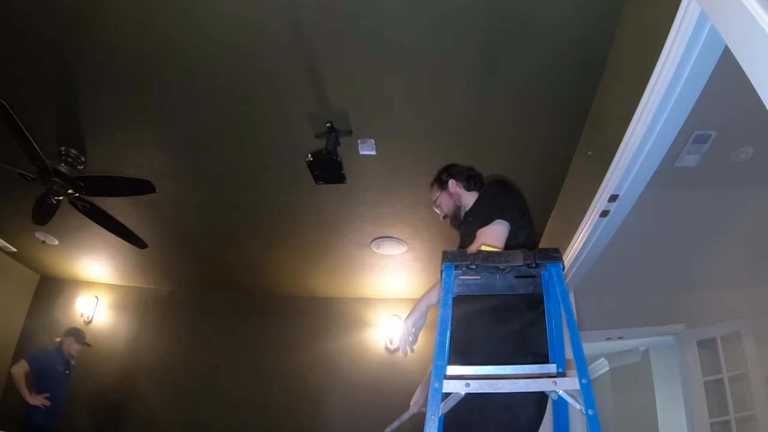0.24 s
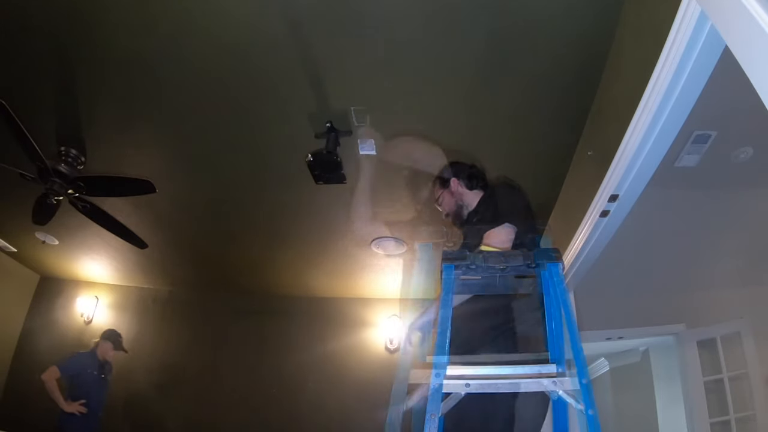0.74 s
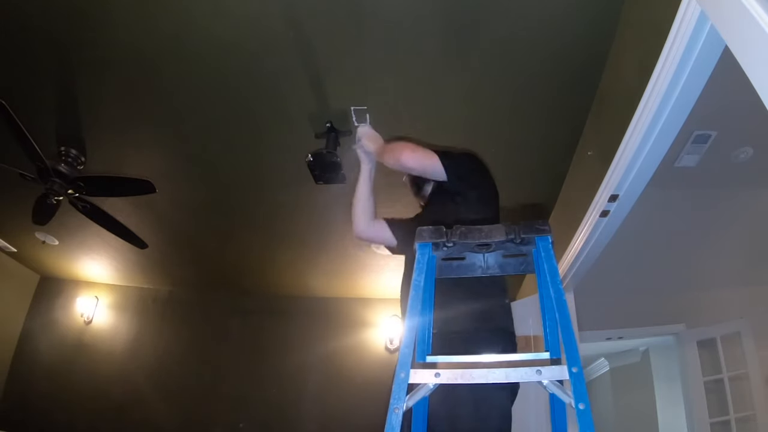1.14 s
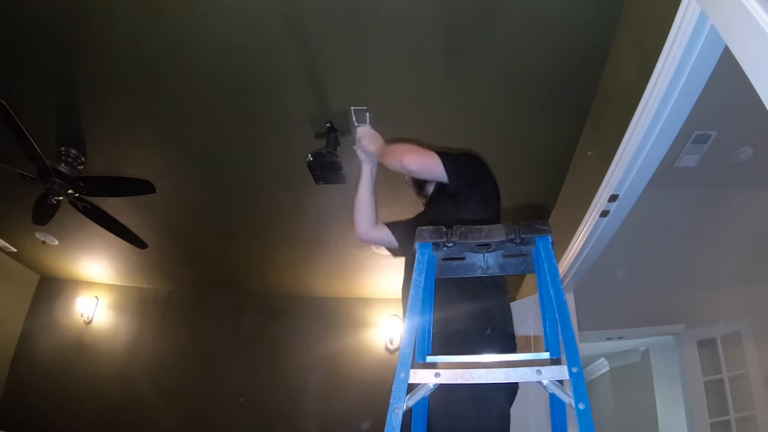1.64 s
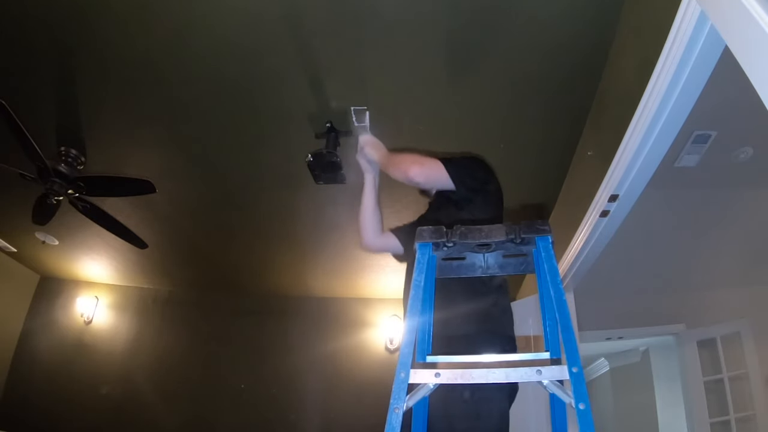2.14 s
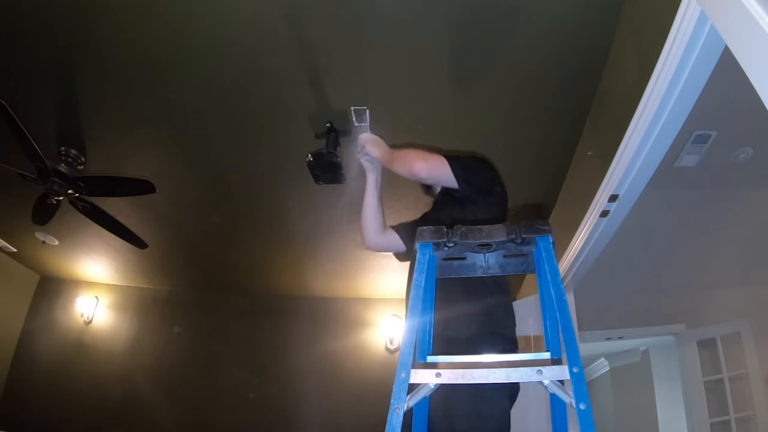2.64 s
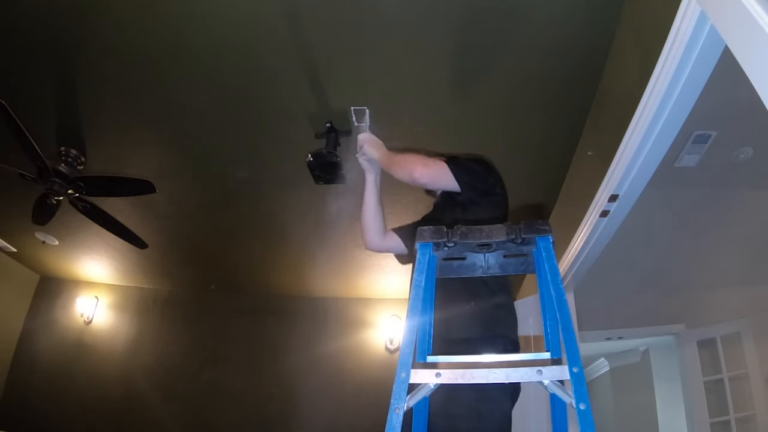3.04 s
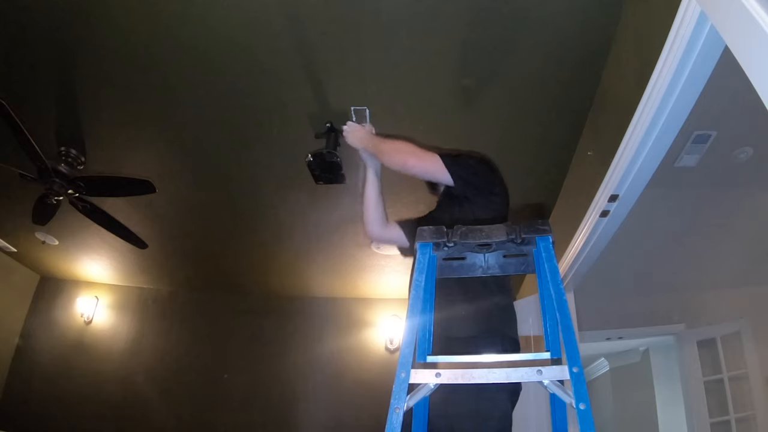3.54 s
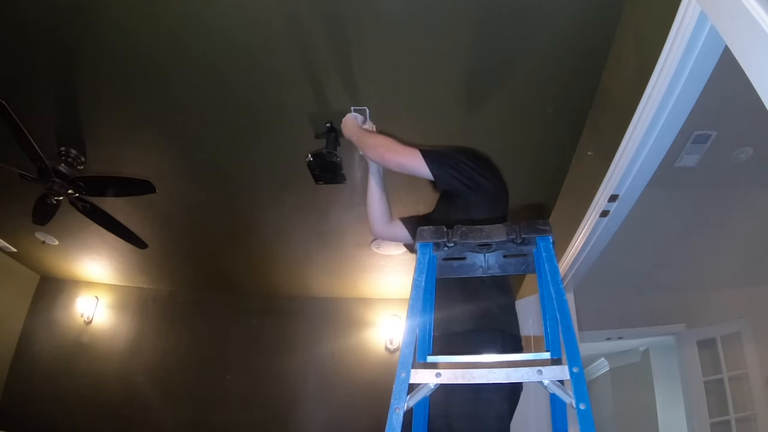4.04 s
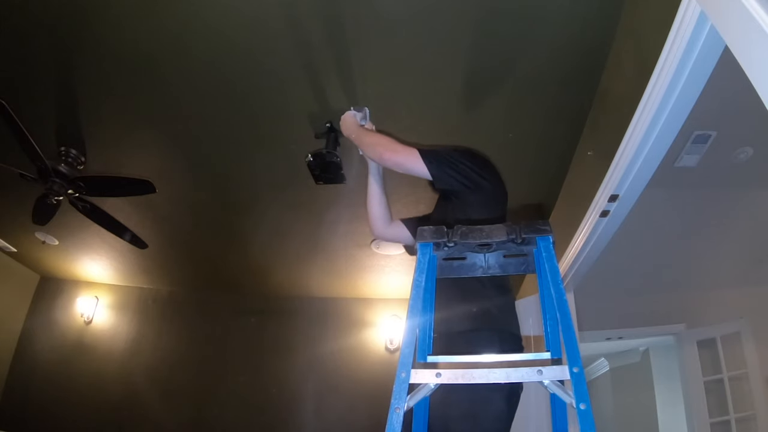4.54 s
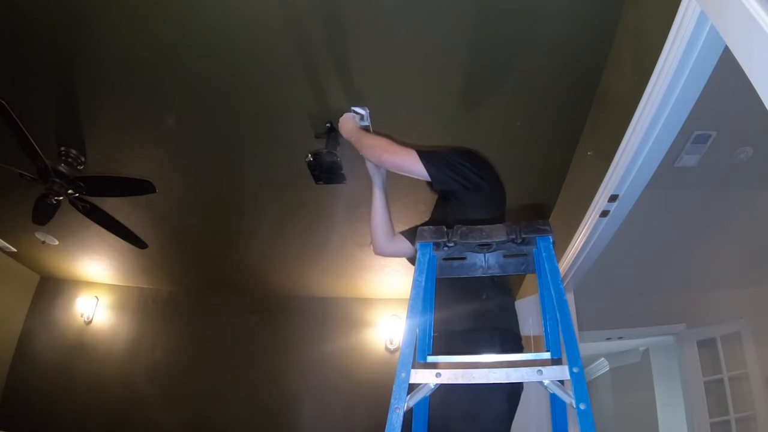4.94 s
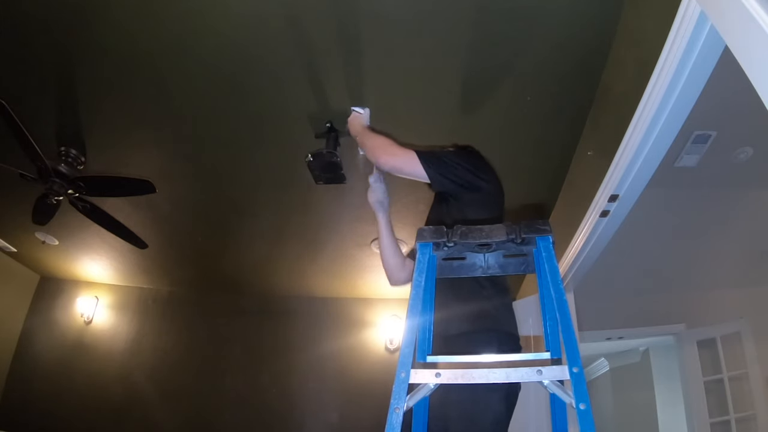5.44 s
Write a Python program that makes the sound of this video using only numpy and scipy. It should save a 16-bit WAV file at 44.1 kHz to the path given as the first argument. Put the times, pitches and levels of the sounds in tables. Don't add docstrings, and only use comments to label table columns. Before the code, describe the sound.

Overhead, a jab saw chews through drywall in brisk strokes with low hollow booming, after two bumps, ending in falling crumbs.

```python
import sys
import numpy as np
from scipy import signal
from scipy.fft import rfft, irfft, next_fast_len
from scipy.io import wavfile
from scipy.ndimage import uniform_filter1d, map_coordinates

SR = 44100
rng = np.random.default_rng(int(sys.argv[2]) if len(sys.argv) > 2 else 0)


def attenuation_scalar(level_db):
    decades = np.asarray(level_db, float) / 20
    return 10 ** decades


def store_wav(level_fs):
    pcm = np.round(np.clip(np.atleast_2d(level_fs), -1, 1) * 32767)
    wavfile.write(sys.argv[1], SR, pcm.T.astype(np.int16))


N = 250488


def unit(x):
    return x / np.sqrt(np.mean(x ** 2) + 1e-20)


def noise():
    return rng.standard_normal((2, N))


def along(points, hz):
    f, v = np.transpose(points)
    return np.interp(np.log(hz + 1), np.log(f + 1), v)


def wobble(knots_hz):
    knots = rng.standard_normal(int(N * knots_hz / SR) + 4)
    return map_coordinates(knots, [np.arange(N) * knots_hz / SR])


def gate(edges_s):
    return np.interp(np.arange(N) / SR, edges_s, [0, 1, 1, 0])


def shifted(x, seconds):
    return np.roll(x, round(seconds * SR))


def steady(x, seconds):
    power = np.abs(uniform_filter1d(x ** 2, int(seconds * SR)))
    return x / np.sqrt(power + 1e-3 * np.mean(x ** 2))


def filtered(x, response):
    m = next_fast_len(N + SR // 2)
    return irfft(rfft(x, m) * response(np.fft.rfftfreq(m, 1 / SR)), m)[..., :N]


def mode_bank(f, modes):
    total = 0
    for k, (hz, width_hz, db) in enumerate(modes):
        damping = 1j * f * width_hz
        total = total + (-1) ** k * attenuation_scalar(db) * damping / (hz * hz - f * f + damping)
    return total


def resonant(x, modes, broad_hz, wide_hz):
    broad = [(broad_hz, wide_hz, 0)]
    return filtered(x, lambda f: mode_bank(f, modes) * mode_bank(f, broad))


def coloured(spectrum, channels=1):
    white = rng.standard_normal((channels, N))
    return unit(filtered(white, lambda hz: attenuation_scalar(along(spectrum, hz)))).squeeze()


def ringing(modes, t):
    return sum(attenuation_scalar(db - 60 * t / t60) * np.sin(2 * np.pi * hz * t) for hz, db, t60 in modes)


# frequency in Hz, correlation.
LIKENESS = [(30, 0.67), (60, 0.93), (400, 0.92), (650, 0.42), (1200, 0.079), (3000, 0.6), (8000, 0.13)]


def paired(a, b):
    def angle(hz):
        return np.arccos(np.clip(along(LIKENESS, hz), -1, 1)) / 2
    mid, side = filtered(np.array([a, b]), lambda hz: np.array([np.cos(angle(hz)), np.sin(angle(hz))]))
    return np.array([mid + side, mid - side])


# frequency in Hz, level in dB per Hz.
HUSH_SPECTRUM = [(15, -21.5), (25, -3), (56, -11.5), (81, -20.5), (191, -7), (450, -28), (833, -24.5),
                 (2070, -34), (11500, -45), (13800, -64), (15000, -41.5)]


def hush():
    level_db = -61
    return attenuation_scalar(level_db) * paired(*coloured(HUSH_SPECTRUM, channels=2))


# frequency in Hz, t60 in seconds.
ROOM_DECAY = [(60, 0.5), (200, 0.27), (1000, 0.46), (4000, 0.39), (12000, 0.29)]


def room(x):
    step, delay = SR // 4, 300
    out = np.zeros((2, N + 2 * SR))
    x, fade = np.pad(x, (step, 2 * step)), np.hanning(2 * step)
    for at in range(0, N + step, step):
        hz, t, z = signal.stft(rng.standard_normal((2, SR // 2)), SR, nperseg=256)
        decay = attenuation_scalar(-60 * t / along(ROOM_DECAY, hz)[:, None])
        tail = signal.istft(z * decay, SR, nperseg=256)[1]
        tail = tail / np.linalg.norm(tail[0])
        wet = signal.fftconvolve((fade * x[at:at + 2 * step])[None], tail, axes=1)
        out[:, at + delay:][:, :wet.shape[1]] += wet
    return paired(*out[:, step:step + N])


# start in seconds, floor ring in dB, thud in dB rel, hard knock in dB rel.
BLOWS = [
    (0.192, -29.5, 2, -21),
    (.212, -17.5, -24.5, -45),
    (0.504, -59, 22, 26),
    (0.564, -34.5, -12.5, -37),
    (4.776, -61, 5.5, -30),
    (4.988, -60.5, 0, -33),
]
# frequency in Hz, level in dB, t60 in seconds.
FLOOR_MODES = [(76.4, 3, 0.24), (155.4, 2, 0.28), (215.5, -6.5, 0.14)]
# frequency in Hz, level in dB, t60 in seconds.
RAIL_MODES = [(166.5, 1, 0.4), (335.6, -10.5, 0.6), (614, -21, 0.15), (787, -2.5, 0.035)]
# frequency in Hz, level in dB per Hz.
THUD_SPECTRUM = [(110, -42.5), (180, -3), (218, -4), (251, -11), (583, -19.5), (1770, -44), (2360, -62),
                 (8000, -80), (10400, -105), (17600, -120)]
# frequency in Hz, level in dB per Hz.
CRACK_SPECTRUM = [(530, -35.5), (900, -8), (2200, -16.5), (7670, -16.5), (8730, -23), (9370, -58),
                  (10900, -37), (15000, -38.5)]


def ladder_blows():
    out, t = np.zeros(N + SR), np.arange(SR // 2) / SR
    thud, crack = coloured(THUD_SPECTRUM), coloured(CRACK_SPECTRUM)
    rise = 1 - np.exp(-t / 0.0041)
    for start_s, ring_db, thud_db, hard_db in BLOWS:
        at = round(start_s * SR)
        soft = ringing(FLOOR_MODES, t) + attenuation_scalar(thud_db - 60 * t / 0.3) * thud[at:][:len(t)]
        hard = ringing(RAIL_MODES, t) + attenuation_scalar(-17.5 - 60 * t / 0.35) * crack[at:][:len(t)]
        out[at:][:len(t)] += attenuation_scalar(ring_db) * (soft * rise + attenuation_scalar(hard_db) * hard)
    return out[:N]


# peak in seconds, level in dB.
LURCHES = [(1.31, -27), (1.58, -31), (1.85, -30), (2.31, -31), (2.74, -29), (3.2, -29), (3.82, -29),
           (4.17, -35), (4.45, -34), (4.58, -38.5)]


def sway():
    rise_db_s, fall_db_s = 36.5, 43
    peak_s, db = np.transpose(LURCHES)[:, :, None]
    since = np.arange(N) / SR - peak_s
    drop_db = np.maximum(fall_db_s * since, -rise_db_s * since)
    return np.sqrt(np.sum(attenuation_scalar(db - drop_db) ** 2, axis=0))


# frequency in Hz, width in Hz, level in dB.
JOIST_MODES = [(42.7, 21, 5), (63.2, 6.9, 7.5), (80, 44, 3)]
# fade-in start and end, fade-out start and end in seconds.
SETTLE_S = [4.6, 4.66, 4.72, 4.77]


def ladder_rocking():
    settle_db = -14.5
    rumble = unit(resonant(noise(), JOIST_MODES, broad_hz=55, wide_hz=77.4))
    active = gate([.66, .72, 4.6, 4.65]) + attenuation_scalar(settle_db) * gate(SETTLE_S)
    return active * sway() * rumble


# start in seconds, peak in dB, time for the rustle to fall by 85 dB in seconds.
CRUMB_FALLS = [(4.639, -31, 0.074), (4.658, -30.5, 0.033), (4.774, -36.5, 0.036), (4.81, -57, 0.11),
               (4.835, -37, 0.042), (4.897, -64.5, 0.048), (4.936, -55, 0.047), (4.987, -39.5, 0.03),
               (5.038, -51.5, 0.095), (5.131, -28.5, 0.066), (5.15, -52, 0.051), (5.185, -31.5, 0.075),
               (5.212, -39, 0.053), (5.23, -34.5, 0.075), (5.251, -37, 0.05), (5.343, -24.5, 0.048),
               (5.37, -35.5, 0.065), (5.397, -40, 0.087), (5.658, -36, 0.17)]
# frequency in Hz, width in Hz, level in dB.
SHEET_MODES = [(908, 280, -7), (1200, 346, -1.5), (1530, 354, -3.5), (2340, 340, -13.5), (2990, 260, -7),
               (3500, 330, -9), (4300, 550, -13.5), (6000, 800, -8.5), (7440, 850, -8.5),
               (11200, 5200, -47.5)]


def crumbs():
    swell, t = np.zeros(N + SR), np.arange(SR // 4) / SR
    rise = 1 - np.exp(-t / 0.004)
    for start_s, db, t60 in CRUMB_FALLS:
        swell[round(start_s * SR):][:len(t)] += attenuation_scalar(db - 4.5 - 85 * t / np.abs(t60)) * rise
    crackle = attenuation_scalar(2.5 * wobble(400)) * rng.standard_normal(N)
    return swell[:N] * steady(resonant(crackle, SHEET_MODES, broad_hz=2946, wide_hz=12000), 0.016)


# time in seconds, board boom in dB, tooth rate in Hz, blade rasp in dB,
# fine dust in dB rel.
FULL_STROKES = [ (0.901, -25, 144.1, -47.5, -2.5), (1.075, -25.5, 145.8, -43.5, -6),
                (1.27, -17, 136.7, -42.5, -3), (1.49, -18.5, 161.5, -42.5, -6),
                (1.735, -15.5, 158.5, -41.5, -3.5), (1.94, -22, 163, -41, -8),
                (2.135, -15.5, 143.4, -41, -3), (2.32, -19, 160, -42, -8), (2.5, -16.5, 139.5, -44.5, -7.5),
                (2.74, -20.5, 130.8, -42, -4.5), (2.94, -21, 133, -44.5, -6.5),
                (3.14, -28, 104.1, -46, -7.5), (3.37, -30, 121.8, -51, -5.5),
                (3.56, -19, 141.1, -43.5, -6.5), (3.736, -21, 123, -45, -7), (3.96, -27.5, 129, -49, -5.5),
                (4.11, -26.5, 139.9, -48.5, -5.5), (4.3, -33.5, 181, -47, -2.5)]
BLADE_DRAGS = [
    (.73, -46, 159.7, -68, -7),
    (.8, -44, 137, -65, -10),
    (.83, -28, 144.5, -54, -7.5),
    (4.401, -31.5, 182.1, -48, -8),
    (4.54, -36.5, 143.2, -61.5, -5),
    (4.658, -59.5, 145, -66, -10),
    (4.872, -53.5, 174.3, -59.5, -11),
    (5.04, -54.5, 138.5, -66.5, -4),
]
# time in seconds, pause depth 0-2, grab of the teeth on the next stroke in dB.
REVERSALS = [ (.995, 0.59, -0.5), (1.179, 1.01, -3.5), (1.408, 1.33, -3.5), (1.615, 1.01, 0),
             (1.839, 0.89, 1.5), (2.03, 0.91, -3), (2.232, 0.82, -0.5), (2.428, 0.88, -1),
             (2.648, 1.42, 1.5), (2.851, 0.84, 5), (3.052, 0.98, 2.5), (3.264, 1.07, -1.5), (3.46, 1.29, 1),
             (3.666, 0.96, 0.5), (3.88, 0.83, 2), (4.023, 0.78, 0.5), (4.26, 1.6, -2)]


def strokes():
    turn_shape = 1.8
    t, rows = np.arange(N) / SR, np.array(sorted(FULL_STROKES + BLADE_DRAGS))
    index = np.arange(len(rows))
    row = np.interp(t, rows[:, 0], index)
    row -= np.sin(2 * np.pi * row) / (2 * np.pi)
    turn_s, depth, grab_db = np.transpose(REVERSALS)
    marks_s = np.sort(np.r_[turn_s, np.array(FULL_STROKES)[:, 0]])
    swing = np.interp(t, marks_s, np.arange(len(marks_s))) / 2
    turn = np.interp(t, turn_s, depth) * np.abs(np.sin(np.pi * swing)) ** turn_shape
    grab_db = np.interp(swing, np.arange(len(FULL_STROKES)), np.r_[0, grab_db])
    return [np.interp(row, index, column) for column in rows.T[1:]], turn, grab_db


# frequency in Hz, width in Hz, level in dB.
BOOM_MODES = [(109, 16, 2.5), (135.3, 28.8, -2.5), (163, 22.6, -1.5), (197.2, 30.8, -5.5)]
# fade-in start and end, fade-out start and end in seconds.
JAM_S = [4.16, 4.22, 4.95, 5.12]


def board_boom(teeth, crumble, push_db, turn):
    lag_s, turn_db, turn_hold = 0.0041, 13, 1.5
    boom_db = shifted(push_db - turn_db * turn ** turn_hold + 1.4 * wobble(25), lag_s)
    loose = 0.71 * attenuation_scalar(-.55 * (boom_db + 16.0))
    beats = resonant(teeth, BOOM_MODES, broad_hz=128.7, wide_hz=110)
    beats = np.clip(1 - 1.4 * gate(JAM_S), 0, 1) * beats
    uneven = resonant(crumble[0], BOOM_MODES[1:], broad_hz=166.0, wide_hz=64)
    return attenuation_scalar(boom_db) * steady(beats + loose * uneven, 0.05)


# frequency in Hz, width in Hz, level in dB.
BOARD_MODES = [(224, 10.3, -2.5), (294.6, 18, 4), (351, 21, -2), (382, 29, -4), (473.4, 38, -7.5),
               (562.3, 29, -14.5), (626, 25.6, -10.5), (762, 41.5, -17), (925, 64, -14.5)]
# fade-in start and end, fade-out start and end in seconds.
FREE_S = [.95, 1.05, 2.2, 2.9]


def board_knock(teeth, crumble, push_db, bite_db, grab_db, turn):
    turn_db, slack_db, freed_db = 14.5, -10, -6
    knock_db = -30.5 + grab_db + 0.32 * (push_db + 19.5) + 0.82 * (bite_db + 43.5) - turn_db * turn
    knock_db += freed_db * gate([4.55, 4.62, 5.5, 5.6])
    hits = 0.29 * teeth * [[1], [0]] + crumble
    knock = steady(resonant(hits, BOARD_MODES, broad_hz=502, wide_hz=1540), 0.052)
    chatter = resonant(np.abs(crumble) * noise(), BOARD_MODES[5:], broad_hz=620, wide_hz=500)
    knock += attenuation_scalar(slack_db) * gate(FREE_S) * steady(chatter, 0.043)
    return attenuation_scalar(knock_db) * knock


# frequency in Hz, width in Hz, level in dB.
BLADE_MODES = [(1010, 540, 1.5), (1398, 220, 7), (1776, 270, -1), (2790, 830, 2), (3796, 255, 0.5),
               (4240, 160, -3.5)]
# frequency in Hz, width in Hz, level in dB.
SING_MODES = [(1700, 130, 18.5), (4370, 210, 0)]


def blade_rasp(bite):
    flex = attenuation_scalar(2 * wobble(20))
    low = resonant(flex * bite * noise(), BLADE_MODES[:3], broad_hz=2460, wide_hz=5130)
    high = resonant(bite * noise() / flex, BLADE_MODES[3:], broad_hz=2460, wide_hz=5130)
    song = unit(resonant(bite * noise(), SING_MODES, broad_hz=4350, wide_hz=900))
    return unit(low + high) + attenuation_scalar(-12.5 + 3.2 * wobble(12)) * gate(FREE_S) * song


# frequency in Hz, level in dB per Hz.
DUST_SPECTRUM = [(2820, -36.5), (4800, 0), (7290, 9.5), (7730, 6), (8880, -7), (13200, -29.5), (15600, -32)]
# frequency in Hz, level in dB per Hz.
POWDER_SPECTRUM = [(7500, -38.5), (9500, 0.5), (13000, -7.5), (15600, -18.5)]


def grit_scrape(bite, bite_db, dust_db, turn):
    rasp_turn_db, dust_turn_db, lead_s = 9.5, 3.5, 0.015
    powder_db, powder_growth = -73, 2.5
    rasp_db = bite_db - rasp_turn_db * turn
    dust_db = dust_db - dust_turn_db * turn + shifted(rasp_db, -lead_s) - rasp_db
    dust = unit(bite * coloured(DUST_SPECTRUM, channels=2))
    scrape = attenuation_scalar(rasp_db + 1.08) * (blade_rasp(bite) + attenuation_scalar(dust_db - 0.03) * dust)
    powder_db = powder_db + powder_growth * (shifted(rasp_db + dust_db, lead_s) + 52.5)
    powder = unit(bite * coloured(POWDER_SPECTRUM, channels=2))
    return gate([.69, .71, 4.95, 5.12]) * scrape + attenuation_scalar(powder_db) * powder


def saw():
    (push_db, tooth_hz, bite_db, dust_db), turn, grab_db = strokes()
    tooth_hz = tooth_hz * (1 - .12 * turn)
    phase = np.cumsum(tooth_hz * (1 + .035 * wobble(40))) / SR
    teeth = unit(np.diff(np.floor(phase), prepend=0) * attenuation_scalar(2.8 * rng.standard_normal(N)))
    crumble = unit(noise() * attenuation_scalar(3.45 * wobble(60)))
    bite = attenuation_scalar(1.0 * np.cos(2 * np.pi * phase) + 1.6 * wobble(120) + 0.74 * wobble(35))
    contact = gate([.69, .72, 4.95, 5.12])
    boom = contact * board_boom(teeth, crumble, push_db, turn)
    knock = contact * board_knock(teeth, crumble, push_db, bite_db, grab_db, turn)
    return boom, knock + grit_scrape(bite, bite_db, dust_db, turn)


def scene():
    blows, rocking, bits = ladder_blows(), ladder_rocking(), crumbs()
    boom, grit = saw()
    send = attenuation_scalar(-10) * boom + attenuation_scalar(-7.0) * grit[0] + attenuation_scalar(-5.0) * blows + attenuation_scalar(6.0) * bits
    return hush() + room(send) + blows + paired(*rocking) + bits + boom + paired(*grit)


def top_cut(x):
    return signal.sosfilt(signal.butter(12, 15700, fs=SR, output="sos"), x)


# frequency in Hz, left minus right in dB.
PORT_LEAN = [(60, -2.5), (110, -0.5), (200, -3), (380, -3), (700, -3.5), (1290, 0.5), (2380, -0.5),
             (4400, -1.0), (8120, 1.0), (15000, 2.5)]


def record(dry):
    halves = np.array([[.5], [-.5]])
    ports = filtered(dry, lambda hz: attenuation_scalar(along(PORT_LEAN, hz) * halves))
    return top_cut(ports)


dry = scene()
out = record(dry)
store_wav(out)
```